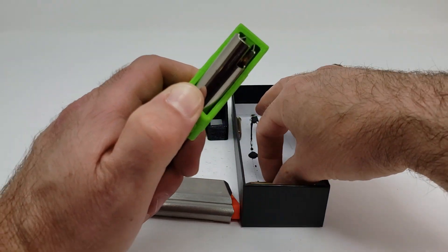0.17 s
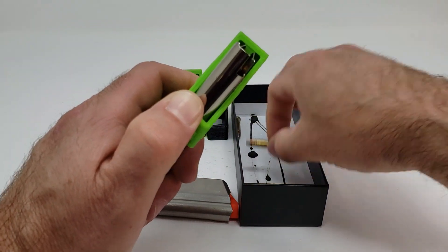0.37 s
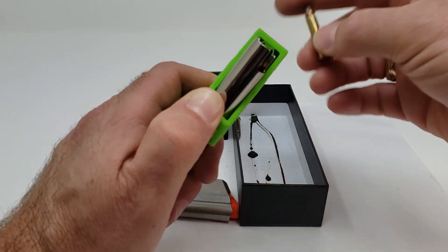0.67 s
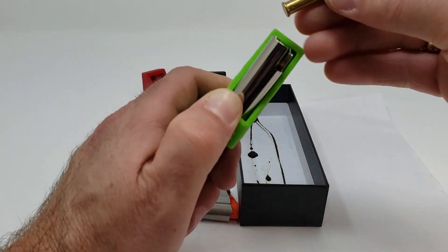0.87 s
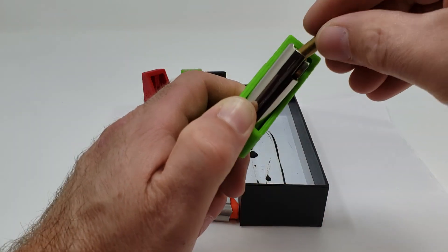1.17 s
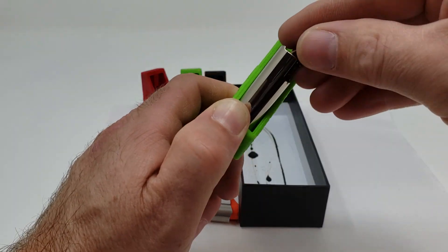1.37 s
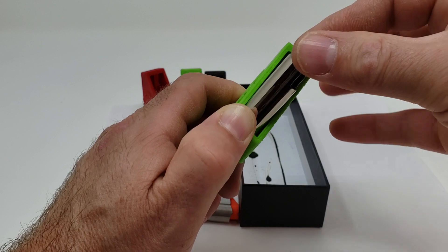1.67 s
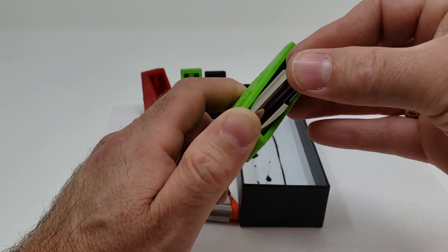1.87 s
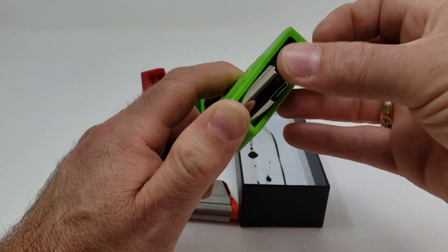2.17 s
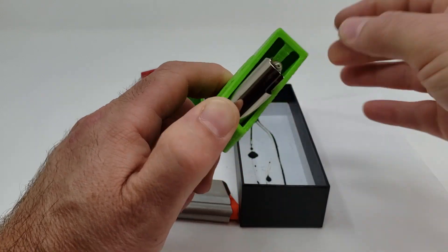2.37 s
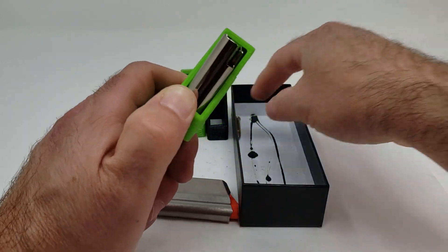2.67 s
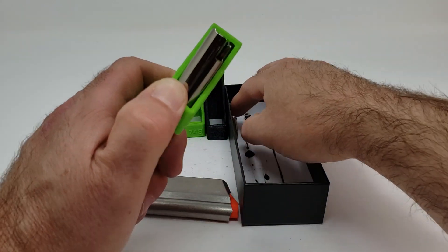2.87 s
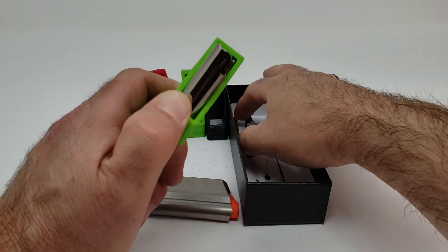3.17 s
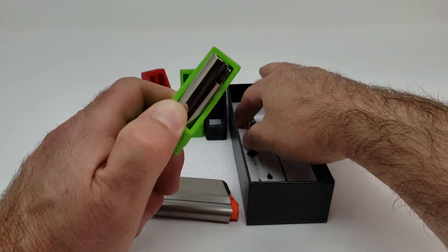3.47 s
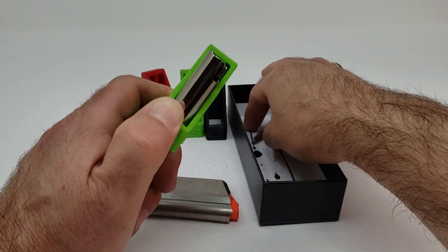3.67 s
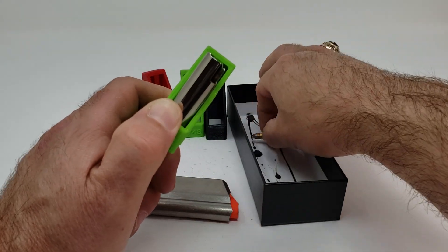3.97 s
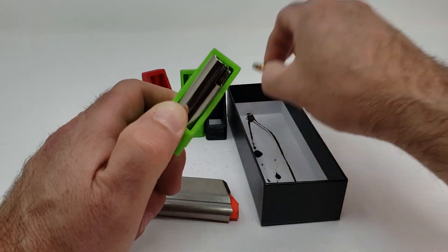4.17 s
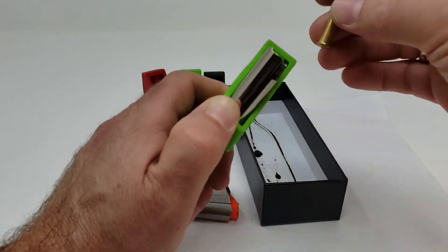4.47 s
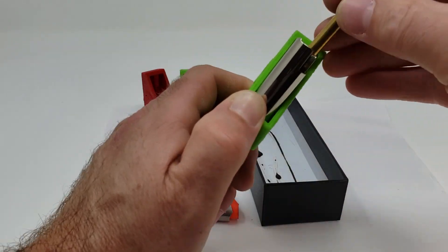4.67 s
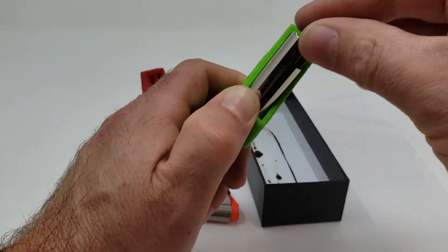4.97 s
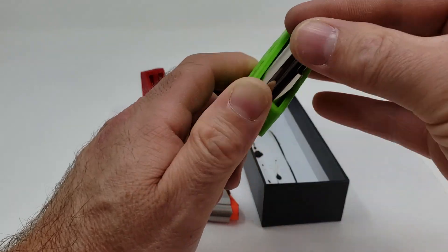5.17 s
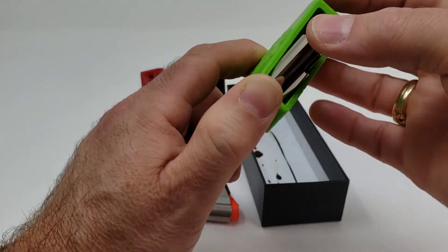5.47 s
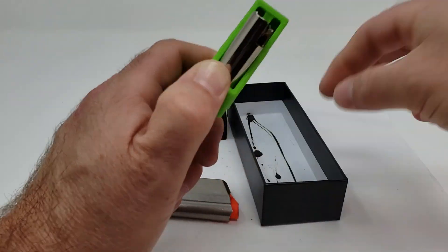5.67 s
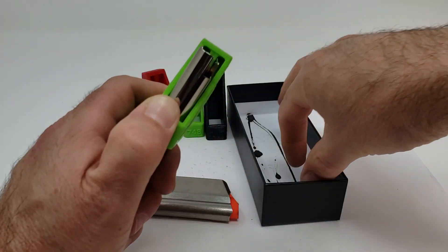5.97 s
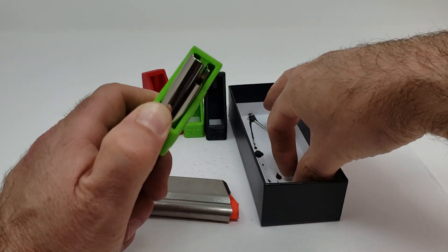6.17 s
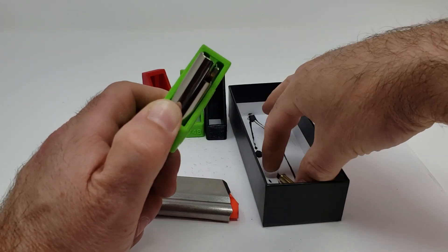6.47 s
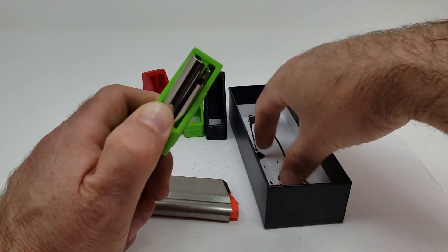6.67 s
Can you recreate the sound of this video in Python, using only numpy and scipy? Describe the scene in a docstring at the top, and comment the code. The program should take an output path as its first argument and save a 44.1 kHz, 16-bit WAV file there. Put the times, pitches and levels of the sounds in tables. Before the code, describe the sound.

In a small indoor room, a low motor hum throbs gently beneath faint air and hiss. At 0-0.3 s fingers knock lightly in a cardboard box and a brass case gives a tiny, very high clink. After a pause, sharp snaps begin at about 1.06 s as a cartridge meets the steel magazine; clicks and thin scrapes gather from 1.8 to 2.4 s, strongest near 2.0, with a small ring at 2.26 and a fading slide to 2.6. From 2.8 to 3.9 s fingers rub and tap softly in the box, loose rounds tumbling, with dull hand bumps. A faint brush passes at 4.1. From 4.7 to 5.8 s a second cartridge goes in: close clicks, scratchy slides, a low hollow loader knock at 5.18, a bright snap and clink at 5.54. From 6.1 s rummaging resumes with small clinks, ending in a firm knock near 6.72.

```python
"""Small brass cartridges are pressed into a steel magazine held in a plastic loader: close snaps and scrapes.
Behind, fingers rub and knock in a cardboard box as they pick out rounds, and the brass cases clink.
Hits are noise bursts through body resonances, friction is a stream of stick-slips, clinks are sine modes.
Scrapes, and one low hollow knock of the loader, are noise through narrow peak filters.
Two motors beat against each other in the small room, as steady hum tones over air noise and low bumps."""
import sys
import numpy as np
from scipy import signal
from scipy.fft import rfft, irfft, next_fast_len
from scipy.io import wavfile
from scipy.ndimage import uniform_filter1d

SR = 44100
rng = np.random.default_rng(int(sys.argv[2]) if len(sys.argv) > 2 else 0)


def transcribe(u):
    """Save the signal u as a 16-bit wav file named by the first command-line argument.

    u: samples, shape (n,) or (channels, n), limited to [-1, 1]; the rate is SR.
    q: integer samples, one column per channel.
    """
    v = np.clip(np.atleast_2d(u).T, -1, 1)
    q = np.round(v * 32767).astype(np.int16)
    wavfile.write(sys.argv[1], SR, q)


N = 301203

# Levels in the event tables are relative: each layer adds its own gain.
# snaps of round, feed lips and loader: start_s, level_db, tilt_db_per_octave (hardness), pitch_hz, boost_db
SNAPS = [(1.0611, -37.5, 2, 5200, 17.5), (1.0672, -21.5, 5.5, 3120, 10), (1.1842, -33, 1, 3300, 6.5),
         (1.392, -42, -0.5, 4940, 6), (1.55, -56, -2.5, 8060, 5.5), (1.6091, -48.5, -3, 4270, 5.5),
         (1.7062, -34.5, 5.5, 2840, 8), (1.8119, -50, 2, 4340, 11.5), (1.863, -32.5, 8, 2330, 21),
         (1.8734, -34, 1, 1780, 17.5), (1.8875, -37.5, -2.5, 1860, 22), (1.9124, -35, -9, 9600, 17.5),
         (1.943, -45.5, -4, 1897, 12.5), (1.988, -20.5, -1.5, 1714, 17.5), (1.9946, -30, -7, 1660, 3),
         (2.025, -46.5, -6, 3160, 11), (2.155, -48, -3.3, 2110, 12), (2.196, -38, 5, 1500, 7.5),
         (2.2595, -29, -0.5, 4490, 10), (2.3368, -33, 4, 1450, 5), (2.378, -34.5, -1.5, 2510, 2.5),
         (4.6792, -28, 0, 3730, 11.5), (4.699, -37.5, -2, 1680, 14.5), (4.814, -27, 2, 5500, 8.5),
         (4.8333, -25.5, 0, 1980, 6), (4.8421, -27.5, -1, 1770, 11.5), (4.8787, -42, 0, 4810, 7),
         (4.896, -30.5, -1, 3900, 12), (4.9931, -28, 1.5, 1740, 4.5), (5.036, -28, 0, 9300, 12),
         (5.0745, -25, 7.5, 4150, 7), (5.1665, -29.5, 1, 1890, 12), (5.179, -40.5, -6.5, 1820, 16),
         (5.1999, -40.5, -10, 9400, 26.5), (5.2452, -28, -3.5, 1860, 20), (5.3052, -37.5, -7, 1570, 13),
         (5.349, -36, 2.5, 1550, 6), (5.5222, -46, -8, 10250, 13), (5.5363, -21.5, -2, 4270, 9.5),
         (5.5969, -39, 6, 2260, 25), (5.6256, -37.5, -3.5, 2870, 11), (5.663, -44, -2, 7000, -16),
         (5.7541, -35, -1, 2590, 1.5), (5.7719, -33.5, 5, 3780, 3)]
# strokes of brass and fingers along the magazine: start_s, end_s, level_db, brightness_db_per_band, swell_db
SLIDES = [(1.10, 1.165, -63, 20, -3.5), (1.63, 1.70, -71.5, 11, 2), (1.81, 1.95, -62.5, 6, 6.5),
          (2.03, 2.16, -64.5, 7, 11), (2.21, 2.33, -67.5, 14, 1), (2.435, 2.58, -57, 2.5, -2.5),
          (4.71, 4.80, -72.5, 16, -4), (4.82, 4.89, -52, 1, 5.5), (5.11, 5.23, -52, 8.5, 3.5),
          (5.31, 5.43, -56, 6, -10.5), (5.56, 5.79, -59, 3.5, -5)]
# scrapes that catch on one resonance, and at 5.178 s a low hollow knock of the loader, made the same way:
# start_s, end_s, pitch_hz, width_hz (half of each filter's), level_db
SCRAPES_AND_LOADER_KNOCK = [(0.116, 0.148, 810, 257, -37.5), (0.199, 0.218, 930, 260, -43),
                            (1.09, 1.17, 3400, 250, -63), (1.802, 1.95, 2400, 220, -60),
                            (1.982, 1.993, 1890, 350, -25), (1.985, 2.037, 3180, 300, -41),
                            (2.10, 2.132, 5730, 450, -48.5), (2.083, 2.14, 3060, 200, -54),
                            (2.093, 2.144, 1790, 250, -52), (2.259, 2.288, 4300, 250, -48),
                            (2.367, 2.388, 2450, 200, -47), (2.447, 2.635, 3220, 200, -59.5),
                            (2.9, 2.925, 1740, 180, -51.5), (5.178, 5.233, 845, 258, -43.5),
                            (5.15, 5.292, 1950, 347, -56), (5.368, 5.437, 6020, 280, -49.5),
                            (5.681, 5.78, 3070, 250, -53), (6.357, 6.432, 4140, 300, -45.5),
                            (6.531, 6.58, 2180, 120, -52)]
# resonances of magazine and loader: pitch_hz, width_hz, boost_db
MAGAZINE = [(1640, 110, 1.5), (1870, 260, 3), (2058, 210, 3), (2370, 140, 9.5), (3200, 440, 8.5),
            (4730, 99, 9), (5100, 170, 3), (5560, 1300, 7), (7350, 120, 8), (9470, 98.3, 2.5),
            (10660, 240, 1)]
# colour that all snaps share: frequency_hz, density_db_per_hz
SNAP_COLOUR = [(500, -12.5), (1000, -14), (1500, -6.5), (2600, -3), (4000, -3.5), (6500, 2.5), (9500, 8.5),
               (12000, 9.5), (15500, 2.5)]
# colour of friction on the magazine: frequency_hz, density_db_per_hz
SLIDE_COLOUR = [(500, -21.5), (1200, 0), (1900, 4), (3200, -3.5), (4500, -8), (6500, -6), (10000, 3),
                (16000, 0)]
# edges of the bands of magazine friction: edge_hz
SLIDE_BANDS = [1300, 4000, 16000]
# brass cases set ringing, in the box or as they seat: start_s, level_db, pitch_hz, spread_hz, t60_s
CLINKS = [(0.076, -50, 13600, 350, 0.11), (0.122, -45, 13800, 350, .06), (0.137, -17.5, 12980, 260, 0.06),
          (0.213, -40, 13200, 350, 0.15), (0.278, -43, 13600, 350, .09), (0.286, -34, 13400, 350, .07),
          (2.258, -25, 11200, 397, 0.088), (5.536, -23, 11750, 450, 0.068),
          (6.339, -33.5, 13200, 900, 0.043), (6.368, -42.5, 13300, 2600, 0.17),
          (6.374, -48.5, 9600, 400, 0.46), (6.524, -44, 13900, 400, 0.12)]
# modes of the brass cases: pitch_hz, level_db
BRASS = [(9590, 9.5), (9950, -21), (11100, -5), (11600, 3.5), (11800, 6), (12170, -10.5), (12820, 0.5),
         (13230, 0.5), (13330, -26.5), (13790, 4.5), (14050, -7)]
# knocks of fingers and rounds on the box: start_s, level_db, tilt_db_per_octave (hardness), pitch_hz, boost_db
KNOCKS = [(0.106, -45, -10, 1120, 2), (0.12, -30, 2.5, 785, 11), (0.13, -30, 4.5, 2320, 6.5),
          (0.209, -33, 3.5, 830, 2.5), (0.284, -29.5, 1.5, 1640, 7), (2.814, -34.5, -1.5, 1700, 9),
          (2.855, -47, 2, 2000, 10), (2.904, -44.5, -1.5, 1620, 24.5), (3.051, -42.5, -3, 2050, 9),
          (3.221, -39.5, 3, 2060, 8.5), (3.302, -40, 1.5, 1650, 18.5), (3.474, -39.5, 1, 1310, 19.5),
          (3.522, -33.5, -3.5, 1430, 12.5), (3.584, -50.5, -5, 1210, 13), (3.613, -48.5, -8, 1270, 19.5),
          (3.71, -43, 1, 1130, 10), (3.746, -39.5, 0, 1400, 15), (3.789, -39, -4.5, 1330, 6),
          (3.826, -42, -4.5, 885, 13.5), (3.857, -54, -5, 1510, 22), (6.318, -40, -0.5, 1320, 15),
          (6.34, -32.5, -3.5, 1590, 15), (6.355, -38.5, 1, 1720, 18), (6.4825, -37, -7, 990, 6.5),
          (6.501, -34.5, -4, 1600, 11), (6.608, -35, -2, 1650, 6.5), (6.695, -34, 3.5, 866, 10),
          (6.724, -19.5, 0, 1700, 10), (6.738, -29, 3.5, 1430, 12)]
# loose rounds tumbling under the fingers: start_s, end_s, tick_level_db, pitch_hz
TUMBLES = [(3.43, 3.57, -46, 1270), (3.641, 3.89, -45.5, 1240), (6.195, 6.42, -55.5, 990),
           (6.521, 6.803, -52.5, 1080)]
# strokes of the fingers searching the box: start_s, end_s, level_db, brightness_db_per_band, swell_db
RUMMAGE = [(0.0, 0.025, -66.5, -5.5, -1), (0.09, 0.27, -64.5, 0.5, -2.5), (2.81, 2.94, -61.5, 1.5, -8),
           (3.03, 3.16, -67, 3, -7), (3.29, 3.375, -58, 2, 8), (3.41, 3.54, -60.5, 1.5, -5),
           (3.63, 3.87, -62.5, 1.5, 1), (4.08, 4.16, -65, 0.5, -7.5), (6.06, 6.31, -66.5, 0.5, 11),
           (6.34, 6.44, -52, 4, -2), (6.49, 6.80, -56, -3, -5)]
# resonances of the box: pitch_hz, width_hz, boost_db
BOX = [(669, 21, 10), (811, 68, 7.5), (988, 37, 4.5), (1050, 135, 6.5), (1257, 56, 1), (1486, 240, 2.5),
       (2098, 94, 10.5), (2570, 270, 8.5), (3420, 36, 9.5), (3720, 36, 9), (5000, 35, -11)]
# colour that all knocks share: frequency_hz, density_db_per_hz
KNOCK_COLOUR = [(500, 5), (700, 7.5), (1050, 9.5), (1500, -1), (2100, -1), (2700, -3), (3500, -5),
                (4700, -11), (8500, -15.5), (12500, -12.5), (15500, -25)]
# colour of friction in the box: frequency_hz, density_db_per_hz
RUMMAGE_COLOUR = [(220, 7), (300, 16.5), (400, -0.5), (560, 10), (800, 4), (1300, -4.5), (1900, -14),
                  (3500, -16.5), (4800, -17.5), (8000, -13.5), (13000, -7), (16000, -14)]
# edges of the bands of box friction: edge_hz
RUMMAGE_BANDS = [260, 1700, 5000, 16000]
# dull bumps of the moving hands and arms: peak_s, level_db
BUMPS = [(0.09, -46.5), (1.8, -57), (2.59, -46.5), (2.869, -42.5), (3.34, -39), (3.699, -42), (4.03, -46),
         (4.62, -44.5), (6.15, -39.5), (6.329, -44), (6.52, -41), (6.74, -41)]
# tones of the motors' hum: pitch_hz
MOTOR_HZ = [51.026, 58.911, 115.13, 119.95, 172.68]
# rms of each hum tone halfway through, before panning: level_db
MOTOR_DB = [-44.5, -44.5, -59, -73, -69]
# colour of room air and microphone hiss: frequency_hz, density_db_per_hz
AIR = [(20, -16), (45, -3), (55, 12.5), (75, -9), (120, -6.5), (155, -26), (215, -21.5), (280, -9.5),
       (390, -34.5), (540, -27), (1150, -45), (1900, -42.5), (4200, -54), (8000, -57), (12500, -43),
       (16000, -45.5)]
# what the two microphones share: frequency_hz, likeness (0 unrelated, 1 identical)
LIKENESS = [(50, 0.76), (150, 0.83), (300, 0.81), (700, 0.72), (1200, 0.21), (2000, 0.17), (4000, 0.035),
            (8000, 0.034)]
# how the two microphones hear the table top: frequency_hz, left_minus_right_db
BALANCE = [(550, -9), (850, -3), (1300, 2), (2300, 2.5), (5000, 3.5), (9000, -0.5), (13000, -7)]

TIME = np.arange(N) / SR
CUTOFF_HZ = 15900
HIT_SAMPLES = 8192
HIT_TIME = np.arange(HIT_SAMPLES) / SR
DIE_AWAY = np.linspace(1, 0, HIT_SAMPLES)  # contact and friction rings end in silence
PADDED = next_fast_len(N + HIT_SAMPLES, True)
SNAP_PIVOT_HZ, KNOCK_PIVOT_HZ = 6000, 1500  # where the hardness tilt is neutral
SLIP_DB, FLUTTER_DB = 5.5, 2.2
WANDER_DB, WANDERS_PER_S = 2.4, 28
STROKE_TAIL_DB, STROKE_TAIL_S = -15.5, 0.062  # the room lingers after each stroke
KNOCK_ATTACK_S, TUMBLE_ROOM_DB = .0009, -15
TUMBLES_PER_S = 59  # one over the median gap
HUM_RISE_DB_PER_S = 0.6
AIR_DB = -49  # before panning
GRIP_DB = -55.5  # the steady stir of the holding hand
BUMP_FADE_DB_PER_S = 155  # either side of a bump


def contacts(rows, colour, pivot_hz, modes, gain_db, crack_s, crack_db, ring_t60, room_db, room_t60,
             low_hz, lumpy_db, uneven_db, attack_s, favoured_octaves, pan_db):
    """Each contact: a hard crack, a thicket of rattles and reflections, a faint room tail; coloured by the body."""
    out, hz = np.zeros((2, N)), bins(HIT_SAMPLES)
    low_cut = 1 / np.sqrt(1 + (low_hz / (hz + 1)) ** 8)
    body = from_db(at_hz(colour, hz) + resonances(modes, hz)) * low_cut
    octaves = np.log2(np.clip(hz, colour[0][0], CUTOFF_HZ) / pivot_hz)
    crack = from_db(crack_db) * np.exp(-HIT_TIME / crack_s)
    room = from_db(room_db - 60 * HIT_TIME / room_t60)
    ring = from_db(-60 * HIT_TIME / ring_t60) + room
    onset = 1 - np.exp(-HIT_TIME / attack_s)
    balance = pan(at_hz(BALANCE, hz) + pan_db)
    for start_s, level_db, tilt_db, pitch_hz, boost_db in rows:
        white = rng.standard_normal((2, HIT_SAMPLES))
        # reflections arrive in clumps about a millisecond long
        clumps = from_db(lumpy_db * np.repeat(rng.standard_normal(HIT_SAMPLES // 32), 32))
        burst = white * (crack + ring * clumps * onset)
        burst = burst / np.sqrt(np.sum(burst ** 2) / SR)
        # every point of contact favours one broad resonance and its own set of narrow ones
        distance = np.log2((hz + 1) / pitch_hz) / favoured_octaves
        favoured_db = boost_db / (1 + distance ** 2) ** 2
        spot_db = uneven_db * np.interp(hz, np.linspace(0, SR / 2, 90), rng.standard_normal(90))
        response = causal(body * from_db(tilt_db * octaves + favoured_db + spot_db))
        sound = irfft(two_ports(burst) * response * balance)
        add(out, start_s, from_db(level_db + gain_db) * sound * DIE_AWAY)
    return out


def friction(strokes, edges, colour, modes, gain_db, slips_per_s, smooth, ring_t60, attack_s, release_s):
    """Tiny stick-slips of uneven size under a fluttering pressure, each ringing briefly in the body."""
    hz = bins(PADDED)
    sizes = from_db(SLIP_DB * np.minimum(rng.exponential(1, N), 2)) * rng.choice([-1, 1], N)
    slips = rms_one(sizes * (rng.random(N) < slips_per_s / SR))
    slips = slips * from_db(FLUTTER_DB * drift(60))
    # the point of contact wanders between four spots, each with a ring of its own
    spots = np.exp(1.5 * np.array([drift(18) for _ in range(4)]))
    ring_balance = pan(at_hz(BALANCE, bins(HIT_SAMPLES)))
    ringing = 0
    for share in spots / np.sqrt(np.sum(spots ** 2, axis=0)):
        ring = rng.standard_normal((2, HIT_SAMPLES)) * from_db(-60 * HIT_TIME / ring_t60)
        ring = irfft(two_ports(ring) * ring_balance) * DIE_AWAY
        ringing = ringing + rfft(slips * share, PADDED) * rfft(ring, PADDED)
    # skin brushes smoothly between the slips
    brush = two_ports(rng.standard_normal((2, PADDED))) * pan(at_hz(BALANCE, hz))
    rubbing = ringing / np.std(ringing) + smooth * brush / np.std(brush)
    rubbing = rubbing * from_db(at_hz(colour, hz) + resonances(modes, hz))
    out, middle = 0, (len(edges) - 2) / 2
    for k, (low, high) in enumerate(zip(edges, edges[1:])):
        band = 1 / np.sqrt((1 + (low / (hz + 1)) ** 8) * (1 + (hz / high) ** 8))
        # the colour shifts as the fingers change their grip
        wander = from_db(WANDER_DB * drift(WANDERS_PER_S))
        out = out + pressure(strokes, k - middle, attack_s, release_s) * wander * coloured(rubbing, band)
    return from_db(gain_db) * out


def pressure(strokes, bands_up, attack_s, release_s):
    """Gain of one band: strokes set in, swell or sag, and let go; bright strokes favour the upper bands."""
    power = 0
    for start_s, end_s, level_db, bright_db, swell_db in strokes:
        progress = np.clip((TIME - start_s) / (end_s - start_s), 0, 1)
        before, after = np.clip(start_s - TIME, 0, 1), np.clip(TIME - end_s, 0, 1)
        tail = from_db(STROKE_TAIL_DB) * np.exp(-after / STROKE_TAIL_S)
        gate = np.exp(-before / attack_s) * (np.exp(-after / release_s) + tail)
        stroke_db = level_db + bright_db * bands_up + swell_db * (progress - .5)
        power = power + (from_db(stroke_db) * gate) ** 2
    return np.sqrt(power)


def scrapes_and_loader_knock(gain_db):
    """A sliding edge, or once a hollow knock, sounds one resonance: noise through two equal peak filters."""
    out = np.zeros((2, N))
    for start_s, end_s, pitch_hz, width_hz, level_db in SCRAPES_AND_LOADER_KNOCK:
        swell = signal.windows.tukey(max(int((end_s - start_s) * SR), 2), .5)
        b, a = signal.iirpeak(pitch_hz, pitch_hz / (2 * width_hz), fs=SR)
        grains = rng.standard_normal((2, HIT_SAMPLES * 2))[:, :len(swell)]
        resonance = rms_one(signal.lfilter(b, a, signal.lfilter(b, a, grains)))
        add(out, start_s, from_db(level_db + gain_db) * swell * resonance)
    return out


def clinks(gain_db, scatter):
    """Brass cases ring in high sine modes, strongest near a favoured pitch; reflections roughen each ring."""
    out = np.zeros((2, N))
    onset = 1 - np.exp(-HIT_TIME / 0.00062)
    for start_s, level_db, pitch_hz, spread_hz, t60_s in CLINKS:
        ring = 0
        for mode_hz, mode_db in BRASS:
            phase = rng.uniform(0, 2 * np.pi, (2, 1))
            rough = rms_one(uniform_filter1d(rng.standard_normal((2, HIT_SAMPLES)), size=120))
            weight = from_db(mode_db) / (1 + ((mode_hz - pitch_hz) / spread_hz) ** 2)
            ring = ring + weight * np.sin(2 * np.pi * mode_hz * HIT_TIME + phase) * (1 + scatter * rough)
        add(out, start_s, from_db(level_db + gain_db - 60 * HIT_TIME / t60_s) * onset * ring)
    return out


def tumbling(spread_db, tilt_db, boost_db, spread_octaves):
    """Rows of small knocks, unevenly spaced, as rounds roll over on the cardboard."""
    rows = []
    for start_s, end_s, tick_db, pitch_hz in TUMBLES:
        chance = rng.standard_normal((64, 3))
        times = start_s + np.cumsum(np.exp(.5 * chance[:, 0])) / TUMBLES_PER_S
        for s, (_, size, pitch) in zip(times, np.clip(chance, -2, 2)):
            if s < end_s:
                tick_hz = pitch_hz * 2 ** (spread_octaves * pitch)
                rows.append((s, tick_db + spread_db * size, tilt_db, tick_hz, boost_db))
    return rows


def background(handling_hz, pan_db):
    """Motor hum that slowly grows, room air, and the low bumping of the hands as shaped noise."""
    return (motors() + room_air() + hand_bumps(handling_hz)) * pan(pan_db)


def motors():
    """Steady tones, close enough in pitch to beat, under a slow rise in level."""
    hum = sum(from_db(level_db) * np.sqrt(2) * np.cos(2 * np.pi * pitch_hz * TIME)
              for pitch_hz, level_db in zip(MOTOR_HZ, MOTOR_DB))
    return hum * from_db(HUM_RISE_DB_PER_S * (TIME - TIME.mean()))


def room_air():
    """Room air and microphone hiss: steady noise with a fixed colour."""
    noise = two_ports(rng.standard_normal((2, PADDED)))
    return from_db(AIR_DB) * coloured(noise, from_db(at_hz(AIR, bins(PADDED))))


def hand_bumps(handling_hz):
    """Low noise that swells and fades around each bump, over the constant stir of the grip."""
    ratio = bins(PADDED) / handling_hz
    thud = ratio ** 2 / (1 + ratio ** 4.41)
    bump_power = sum(from_db(level_db - BUMP_FADE_DB_PER_S * abs(TIME - peak_s)) ** 2
                     for peak_s, level_db in BUMPS)
    movement = np.sqrt(from_db(GRIP_DB) ** 2 + bump_power)
    return movement * coloured(two_ports(rng.standard_normal((2, PADDED))), thud)


def from_db(db):
    """Decibels to gain."""
    return 10 ** (np.asarray(db) / 20)


def rms_one(x):
    """Scale to unit rms."""
    return x / np.sqrt(np.mean(x ** 2) + 1e-20)


def at_hz(points, hz):
    """Read a spectrum along a log-frequency axis."""
    known_hz, values = np.transpose(points)
    return np.interp(np.log(hz + 1), np.log(known_hz), values)


def bins(size):
    """Frequencies of a real transform."""
    return np.fft.rfftfreq(size, 1 / SR)


def drift(rate):
    """Random wandering of unit rms, through a given number of knots per second."""
    knots = rng.standard_normal(int(N / SR * rate) + 2)
    return rms_one(np.interp(TIME * rate, np.arange(len(knots)), knots))


def resonances(modes, hz):
    """Peaks and dips in dB that a body gives to whatever excites it."""
    return sum(db / (1 + (2 * (hz - centre) / width) ** 2) for centre, width, db in modes)


def causal(gain):
    """Minimum-phase response with this gain: nothing sounds early."""
    cepstrum = irfft(np.log(gain + 1e-9))
    half = len(cepstrum) // 2
    folded = np.r_[cepstrum[0], 2 * cepstrum[1:half], cepstrum[half]]
    return np.exp(rfft(folded, 2 * half))


def pan(db):
    """Left and right gains for a level difference."""
    return from_db(np.array([[.5], [-.5]]) * db)


def two_ports(pair):
    """Spectra of two unrelated signals, blended so that the bass is shared by both microphones."""
    alike = np.clip(at_hz(LIKENESS, bins(pair.shape[1])), -1, 1)
    mid, side = rfft(pair)
    return np.sqrt(1 + alike) * mid + np.sqrt(1 - alike) * side * [[1], [-1]]


def coloured(spectra, gain):
    """Filter a long stereo excitation; unit rms."""
    return rms_one(irfft(spectra * gain)[:, :N])


def add(out, s, sound):
    """Mix a sound in at a time."""
    start = max(int(s * SR), 0)
    out[:, start:start + sound.shape[1]] += sound[:, :N - start]


def scene():
    """The magazine close by, the box behind it, the room around."""
    snaps = contacts(SNAPS, SNAP_COLOUR, SNAP_PIVOT_HZ, MAGAZINE, gain_db=-29.0, crack_s=0.00049,
                     crack_db=4.5, ring_t60=0.06, room_db=-23.0, room_t60=0.4, low_hz=761, lumpy_db=2,
                     uneven_db=4.5, attack_s=0.00079, favoured_octaves=0.37, pan_db=1.0)
    slides = friction(SLIDES, SLIDE_BANDS, SLIDE_COLOUR, MAGAZINE, gain_db=-3.0, slips_per_s=370,
                      smooth=.7, ring_t60=0.015, attack_s=.008, release_s=0.022)
    knocks = contacts(KNOCKS, KNOCK_COLOUR, KNOCK_PIVOT_HZ, BOX, gain_db=-27.5, crack_s=0.00098,
                      crack_db=4.5, ring_t60=0.073, room_db=-15, room_t60=0.33, low_hz=550, lumpy_db=2.5,
                      uneven_db=2.0, attack_s=KNOCK_ATTACK_S, favoured_octaves=0.41, pan_db=1)
    ticks = tumbling(spread_db=5, tilt_db=-4, boost_db=9, spread_octaves=0.26)
    tumbles = contacts(ticks, KNOCK_COLOUR, KNOCK_PIVOT_HZ, BOX, gain_db=-32.5, crack_s=0.0012,
                       crack_db=3, ring_t60=0.052, room_db=TUMBLE_ROOM_DB, room_t60=0.2, low_hz=663,
                       lumpy_db=-2.5, uneven_db=1, attack_s=0.0011, favoured_octaves=0.55, pan_db=5)
    rummage = friction(RUMMAGE, RUMMAGE_BANDS, RUMMAGE_COLOUR, BOX, gain_db=-.5, slips_per_s=320,
                       smooth=1.0, ring_t60=0.034, attack_s=0.0074, release_s=0.02)
    handled = snaps + slides + knocks + tumbles + rummage
    resonant = scrapes_and_loader_knock(gain_db=-5.5) + clinks(gain_db=-6.5, scatter=1.0)
    return handled + resonant + background(handling_hz=76.2, pan_db=-1.6)


def record(dry):
    """The top is cut steeply."""
    return signal.sosfilt(signal.ellip(10, .1, 70, CUTOFF_HZ, fs=SR, output="sos"), dry)


dry = scene()
out = record(dry)
transcribe(out)
```